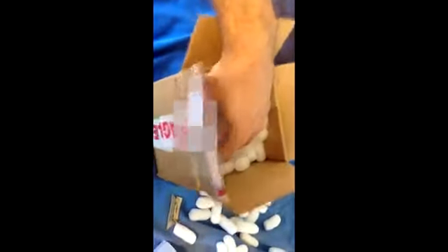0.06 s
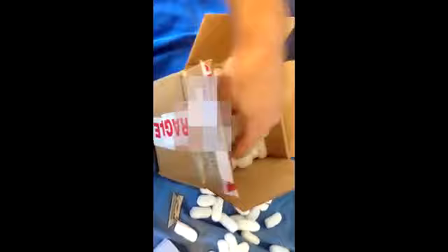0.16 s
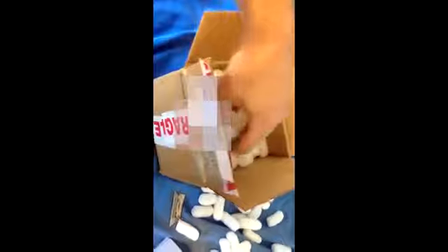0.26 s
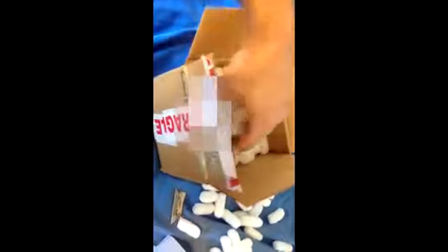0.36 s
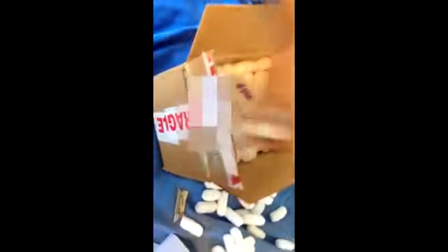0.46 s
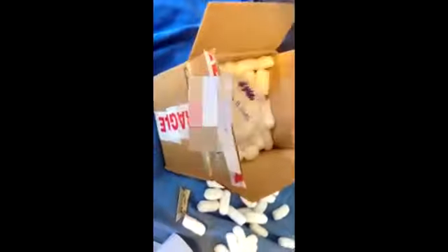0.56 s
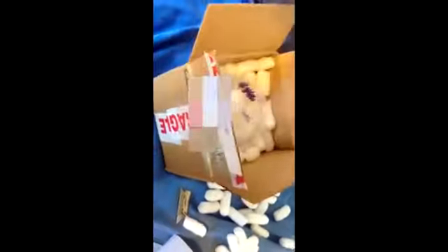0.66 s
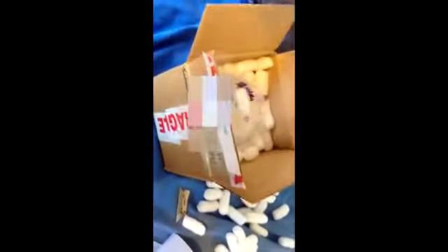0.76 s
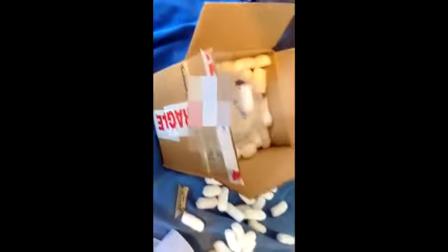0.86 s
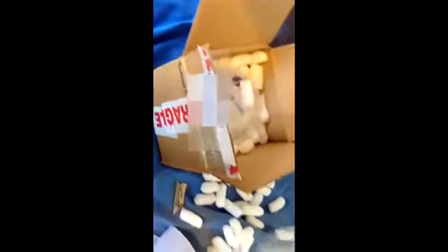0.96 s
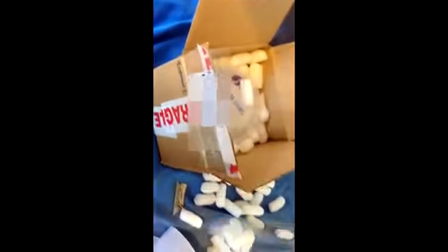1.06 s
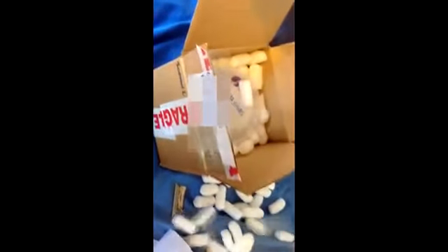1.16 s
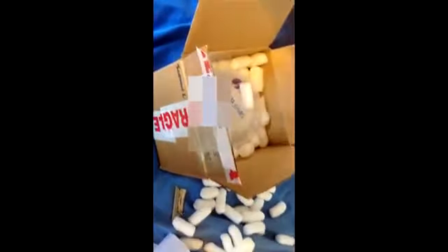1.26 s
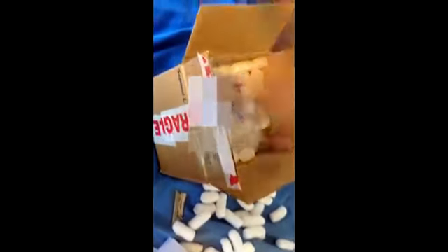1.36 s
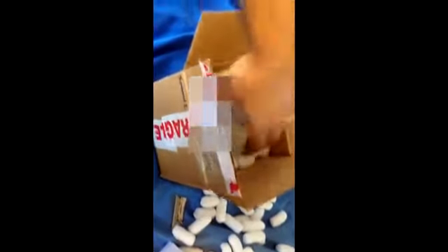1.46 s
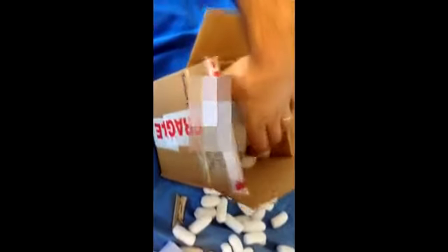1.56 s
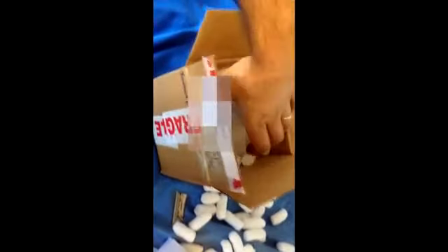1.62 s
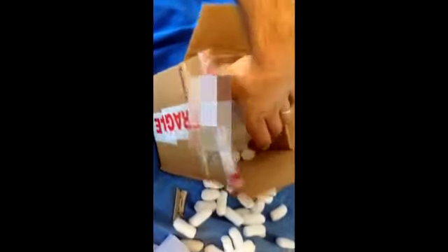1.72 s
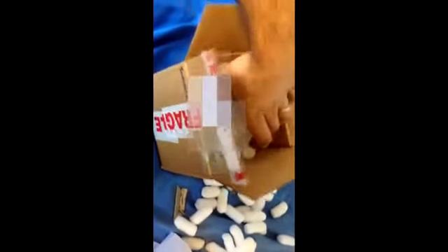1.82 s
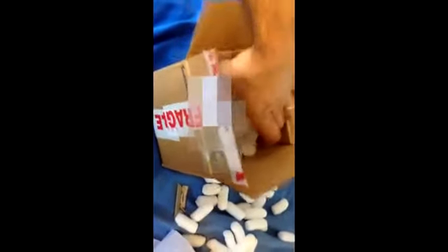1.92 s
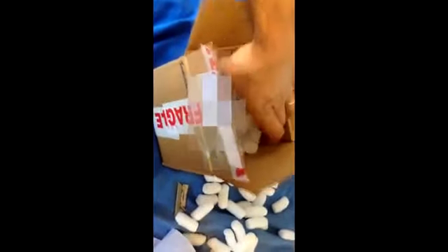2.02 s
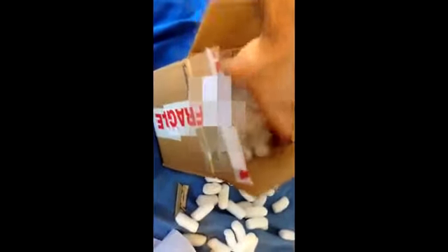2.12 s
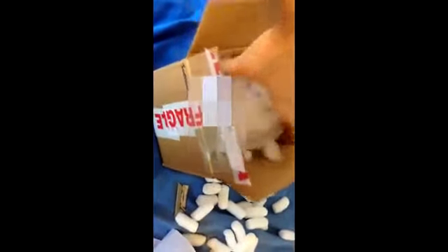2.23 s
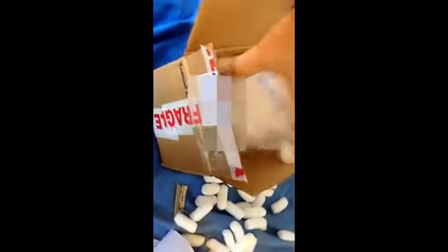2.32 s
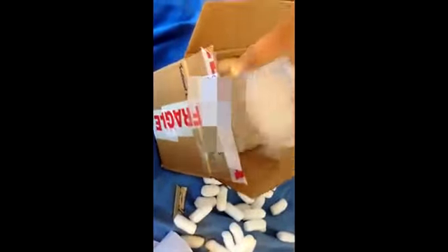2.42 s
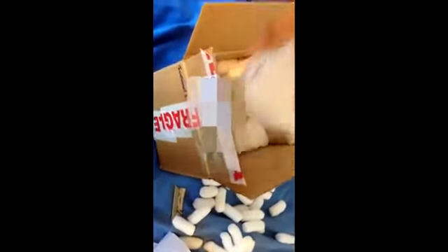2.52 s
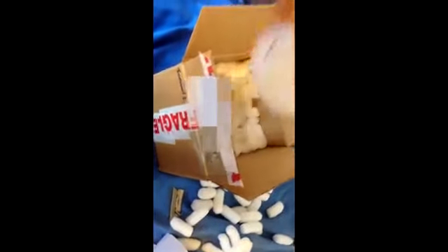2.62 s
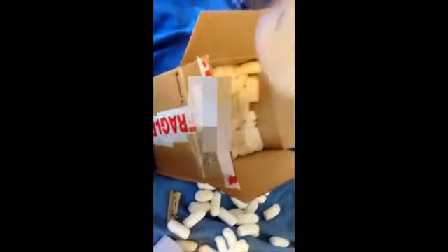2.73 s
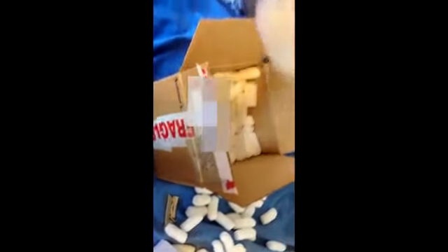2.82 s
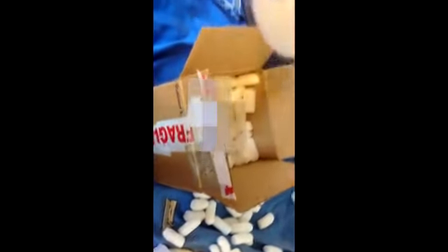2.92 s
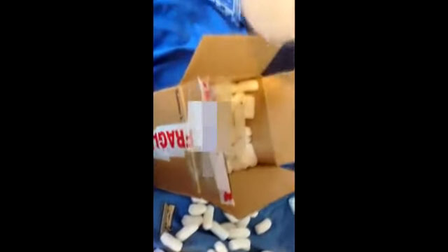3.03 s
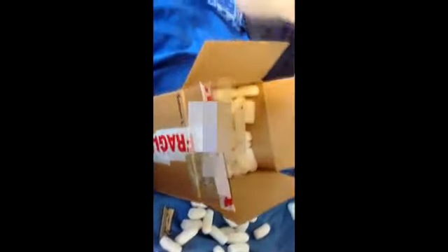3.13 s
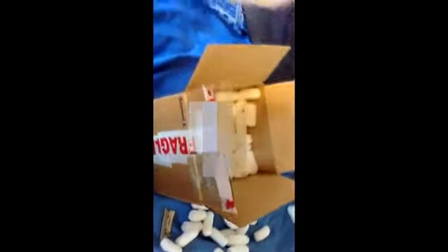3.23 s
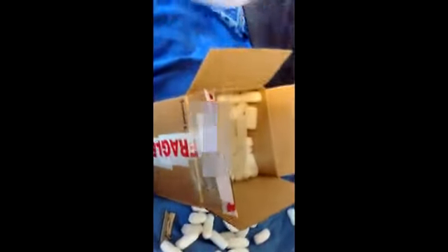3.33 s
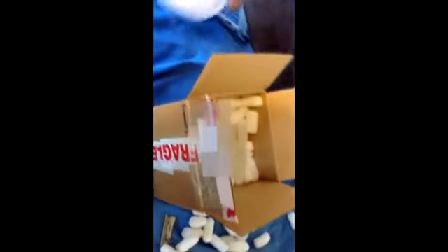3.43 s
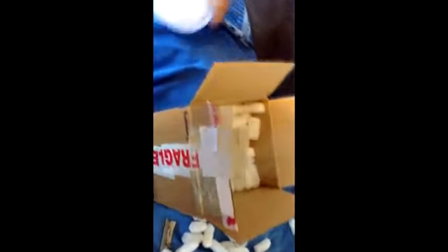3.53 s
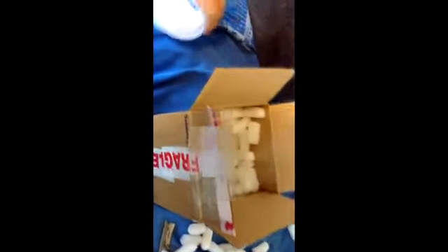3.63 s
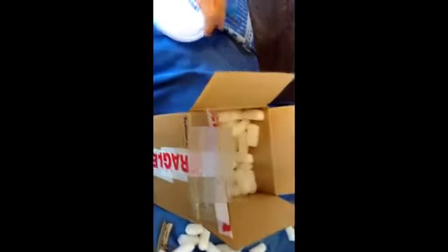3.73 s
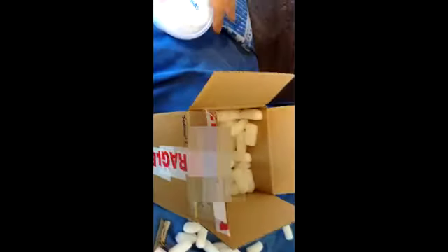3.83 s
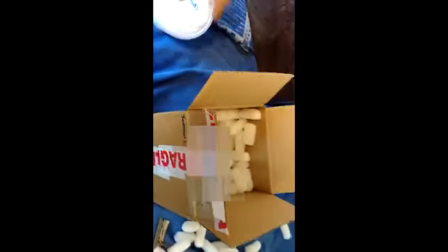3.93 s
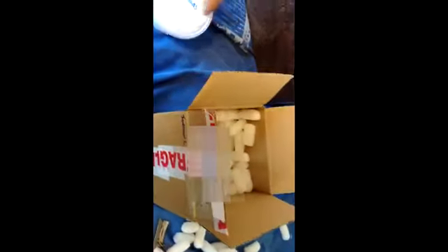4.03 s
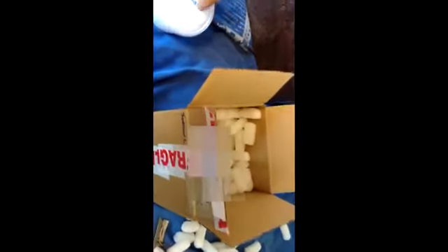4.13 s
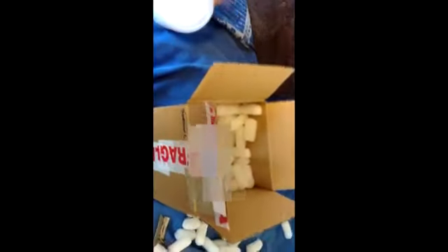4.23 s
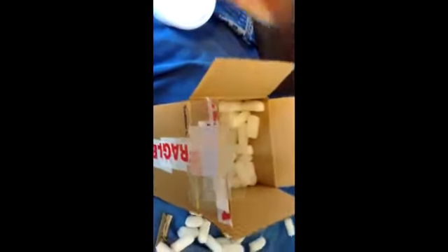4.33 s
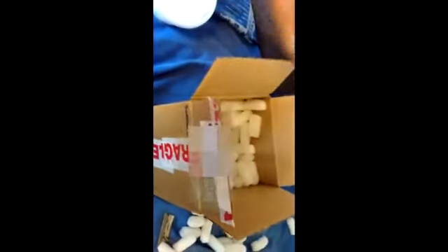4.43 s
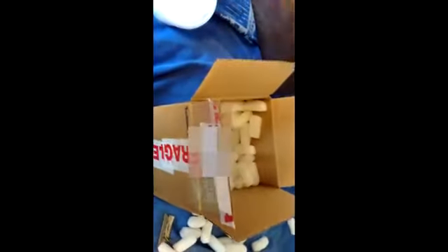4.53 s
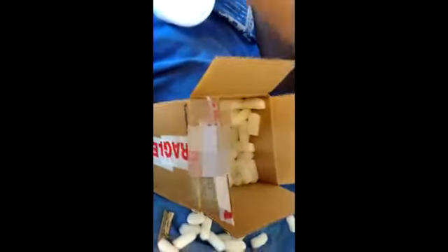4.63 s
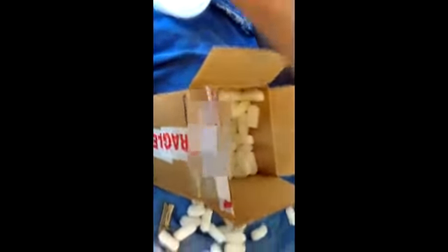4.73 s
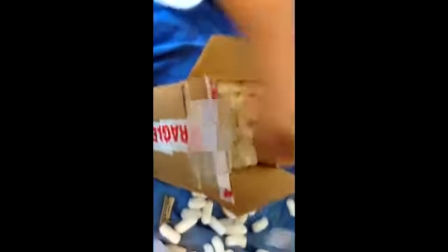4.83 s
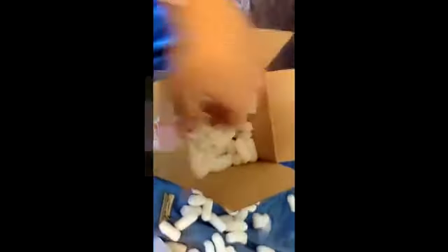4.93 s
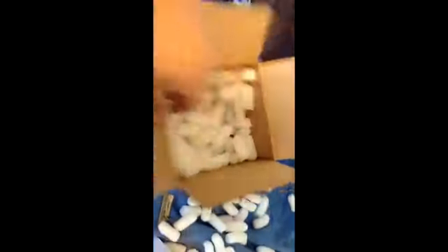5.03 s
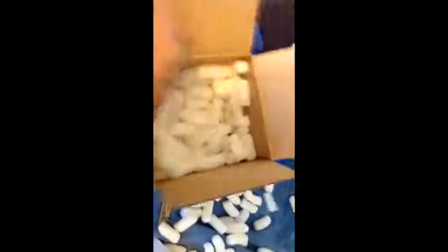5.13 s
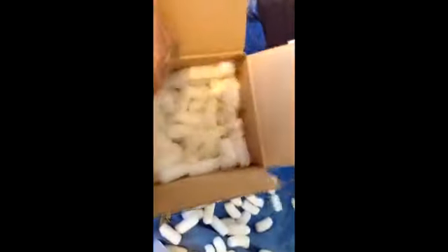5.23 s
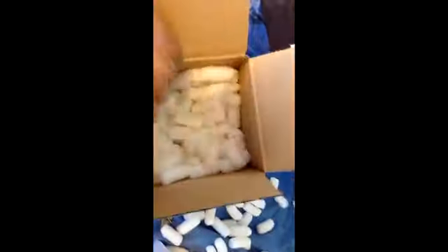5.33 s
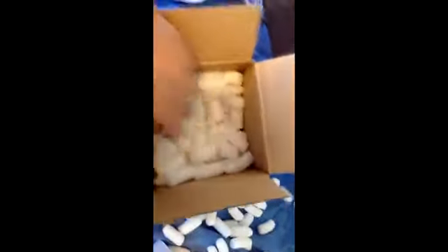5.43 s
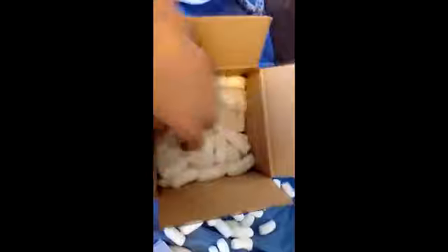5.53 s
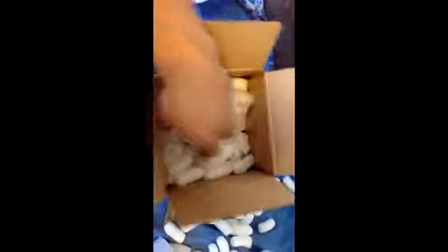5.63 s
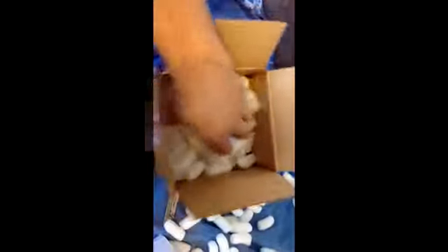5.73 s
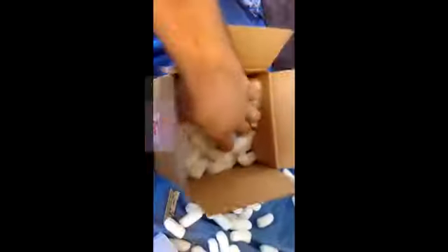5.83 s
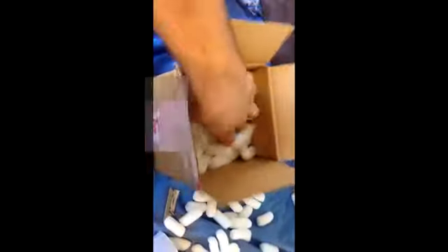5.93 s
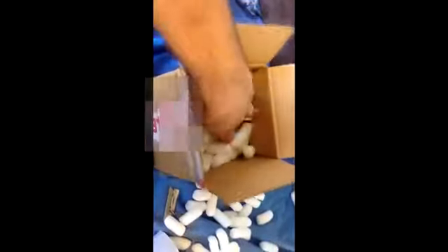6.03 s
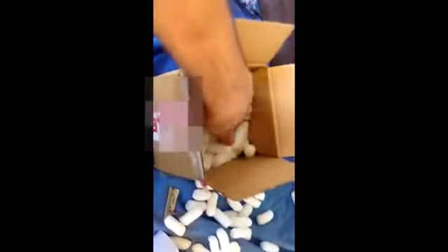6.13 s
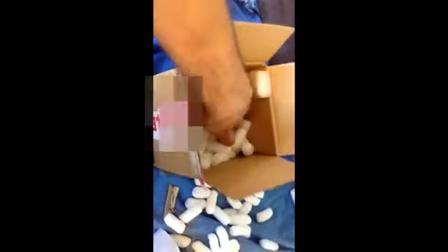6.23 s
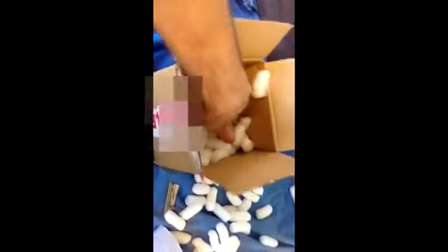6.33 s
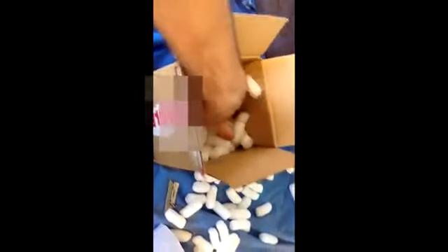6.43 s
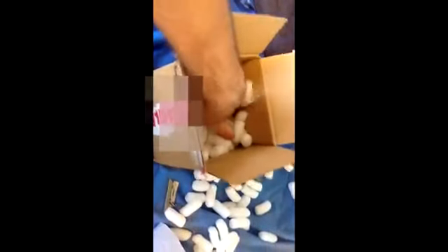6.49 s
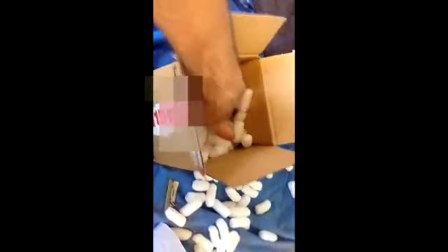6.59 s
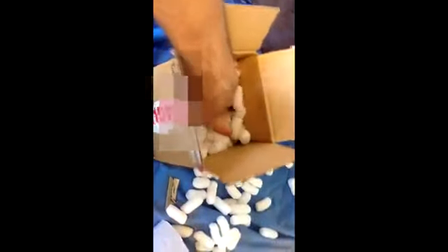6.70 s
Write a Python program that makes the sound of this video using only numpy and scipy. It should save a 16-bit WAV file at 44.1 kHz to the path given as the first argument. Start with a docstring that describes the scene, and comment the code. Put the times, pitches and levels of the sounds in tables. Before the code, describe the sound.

A hand rummages through foam packing peanuts in a cardboard box, heard through a phone microphone with faint hiss in a room with little echo. From the start come dry crackling and crunching in short pushes, with sharp ticks, small scrapes and a soft bump near 0.6 seconds. The rustle eases around 1 second, then swells from 1.5 to 2.4 seconds, with the cardboard drumming lightly underneath. Several light finger knocks and ticks follow until about 3 seconds. Then it is quiet, with only faint rustling and a few small clicks between 4 and 4.6 seconds. Just before 5 seconds a knuckle raps the flap, followed by a couple of sharp ticks. From 5.5 seconds the digging returns at its loudest, dense and crunchy, with hollow knocks on the box around 5.8 and 6.2 seconds, continuing to the end at nearly 7 seconds.

```python
"""In a soft room, a hand digs through foam packing peanuts in a cardboard box, lifts a wrapped parcel
out and digs again. Stick-slip friction between the peanuts makes countless impulses, which excite
resonances of the foam (crackle and crunch) and of the cardboard (drumming). Single peanuts tick and
scrape, a finger knocks the box, a knuckle raps its flap, and padded bumps sound underneath.
A mono phone microphone takes it in and adds its own hiss."""
import sys
import numpy as np
from scipy import signal
from scipy.fft import rfft, irfft, next_fast_len
from scipy.io import wavfile
from scipy.ndimage import uniform_filter1d, map_coordinates

SR = 44100
rng = np.random.default_rng(int(sys.argv[2]) if len(sys.argv) > 2 else 0)


def to_wav(sig):
    """Store sig (one row per channel, or 1-D mono) as 16-bit WAV at the path in sys.argv[1].

    Samples outside -1..1 are clipped; the rate is SR.
    """
    pcm = np.clip(np.atleast_2d(sig), -1, 1) * 32767
    pcm = np.round(pcm).astype(np.int16)
    wavfile.write(sys.argv[1], SR, pcm.T)  # frames by channels


N = 298116

# the digging hand: (time [s], steady crackle [dB], crunch re crackle [dB], drumming re crackle [dB])
DIG_LEVELS = [(0, -51.5, 0.5, -8), (.235, -55.5, -3, -11.5), (.35, -56.5, -1.5, -15), (.62, -63.5, -6, -7),
              (.85, -61.5, -9, -14.5), (1.035, -74, -13, -12), (1.09, -62.5, -6, -11.5),
              (1.46, -78.5, -5, -9), (1.49, -60, -7, -10.5), (1.7, -51, -1.5, -7), (1.9, -48.5, -0.5, -3.5),
              (2.08, -50.5, -0.5, -5), (2.2, -49.5, -10, -16.5), (2.36, -51, -17, -15),
              (2.43, -72, 2.5, 2.5), (2.51, -62.5, -3.5, -3.5), (2.9, -70, -1.5, 3), (3.3, -75.5, -5, -8),
              (4.0, -77, 0.5, 4.5), (4.2, -64, -9, -12.5), (4.4, -74, 1.5, 0.5), (4.58, -72, -12, -17),
              (4.92, -80, -1, 0), (4.97, -67.5, 3.5, 8), (5.09, -72.5, 2, 1.5), (5.27, -61, -1.5, -3.5),
              (5.53, -55, -4, -1), (5.62, -46.5, -3.5, -7), (6.0, -45.5, -1.5, -4.5), (6.45, -46, 1, -3),
              (6.76, -44, 0, -2)]
# separate pushes of the fingers through the foam: (start [s], rise [s], length [s], level [dB])
FINGER_PUSHES = [(0.099, .006, 0.11, -49.5), (0.121, 0.0085, 0.035, -49), (0.246, .004, 0.025, -52),
                 (0.301, .008, 0.041, -54), (0.372, 0.018, 0.057, -55.5), (0.651, 0.022, 0.11, -56.5),
                 (0.759, 0.026, 0.056, -52), (1.037, 0.036, 0.074, -57.5), (1.222, .008, 0.056, -64),
                 (1.478, 0.0075, 0.088, -51), (1.526, 0.0088, 0.091, -47), (1.757, 0.009, .085, -47),
                 (2.055, 0.056, 0.065, -44.5), (2.115, 0.011, 0.13, -45), (2.264, .02, 0.03, -45.5),
                 (2.316, .015, 0.039, -48), (2.741, 0.016, 0.031, -63), (4.118, 0.011, 0.014, -61.5),
                 (4.153, .006, 0.019, -61.5), (4.175, 0.021, 0.077, -61.5), (4.283, 0.039, 0.071, -63.5),
                 (4.549, .015, 0.045, -60.5), (5.03, 0.0087, 0.024, -65.5), (5.295, 0.022, 0.14, -55),
                 (5.398, .05, 0.079, -51), (5.553, .035, 0.054, -44), (5.654, 0.037, 0.035, -41),
                 (5.762, .004, 0.023, -42.5), (5.79, 0.037, 0.056, -42.5), (5.896, 0.067, 0.087, -41.5),
                 (6.199, 0.037, 0.061, -38), (6.26, 0.027, 0.073, -43), (6.472, 0.038, 0.13, -46),
                 (6.593, 0.042, 0.11, -41.5), (6.735, 0.023, .04, -44.5)]
# resonances of the small foam cells: (frequency [Hz], bandwidth [Hz], relative gain [dB])
CELL_MODES = [(4460, 970, -1), (6590, 1620, -0.5), (8150, 1720, -1.5), (12940, 3600, -11.5)]
# resonances of whole peanuts: (frequency [Hz], bandwidth [Hz], relative gain [dB])
PEANUT_MODES = [(925, 570, -9), (1438, 307, 0.5), (2090, 580, 0), (3560, 640, -2)]
# resonances of the cardboard walls: (frequency [Hz], bandwidth [Hz], relative gain [dB])
WALL_MODES = [(330, 89, 0.5), (448, 124, 3), (570, 181, 2.5), (770, 420, -5.5)]
# resonances of the box as a whole: (frequency [Hz], bandwidth [Hz], relative gain [dB])
BOX_MODES = [(138, 66, -12.5), (203.6, 53, 0.5)]
# boom of the whole box: (time [s], level re wall drumming [dB])
BOOM_LEVELS = [(.9, -6), (1.7, -14), (2.4, -1.5), (3.7, 1), (5, -6.5), (6.76, -9)]
# single peanuts ticking: (time [s], level [dB], pitch [Hz])
PEANUT_TICKS = [(0.2304, -43, 4340), (0.292, -29, 6230), (0.571, -34, 5460), (0.7412, -29, 7340),
                (0.86, -37, 7510), (0.944, -38, 7860), (1.048, -31.5, 7900), (1.058, -27.5, 5940),
                (1.075, -42, 8030), (1.089, -39, 5880), (1.098, -34, 6670), (1.1083, -30, 5680),
                (1.17, -31, 3200), (1.233, -35, 5700), (1.541, -23, 4670), (1.815, -28, 3470),
                (1.837, -32, 3460), (2.1122, -20.5, 4120), (2.1985, -24, 8300), (2.237, -26, 6920),
                (2.444, -32, 5910), (2.494, -38, 8530), (2.5022, -38, 3340), (2.536, -39, 4100),
                (2.561, -38, 4050), (2.6439, -40, 6260), (2.7556, -47, 4800), (2.8522, -35, 3330),
                (4.0498, -41.5, 5960), (4.1605, -33.5, 5870), (4.56, -39, 7450), (4.574, -42, 4360),
                (5.1642, -35, 6700), (5.2097, -25, 6000), (5.774, -21, 7560), (6.3025, -25, 6500)]
# one peanut dragged along another: (start [s], end [s], pitch [Hz], level [dB])
PEANUT_SCRAPES = [(0.104, 0.187, 3470, -54.5), (0.245, 0.276, 1680, -54), (1.49, 1.527, 3500, -54.5),
                  (1.53, 1.638, 4630, -51.5), (1.76, 1.867, 3530, -47), (2.057, 2.125, 1720, -58),
                  (2.109, 2.214, 4760, -45.5), (2.272, 2.352, 4500, -59), (4.206, 4.244, 3340, -61),
                  (4.266, 4.51, 1360, -71), (5.568, 5.632, 2150, -48.5), (6.21, 6.342, 2070, -49),
                  (6.605, 6.72, 2100, -52)]
# blows of a finger on the cardboard: (time [s], impulse strength [dB])
FINGER_KNOCKS = [(1.086, -10), (1.189, -11), (1.225, -10), (2.495, -6.5), (2.509, -2), (2.561, -4),
                 (2.575, -8), (2.645, -7), (2.755, -4.5), (2.85, 1.5), (2.917, -7), (5.031, -4),
                 (5.179, -8), (5.259, -7), (5.775, 11), (5.985, 4), (6.243, 6.5)]
# resonances of the loose flap: (frequency [Hz], relative level [dB], T60 [s])
FLAP_MODES = [(136, -5, 0.13), (232, 2.5, 0.056), (306, 0.5, 0.043), (463, -1.5, 0.054), (555, -2.5, 0.067),
              (616, -9, 0.083), (1210, -7, 0.026), (1540, -1.5, 0.014)]
# soft bumps: (centre time [s], envelope peak [dB], pitch [Hz], half-width at 1/e [s])
SOFT_BUMPS = [(.137, -55, 183, 0.019), (0.331, -55, 172, 0.015), (0.563, -54, 128, 0.01),
              (.648, -38.5, 174, 0.0053), (.688, -45.5, 458, 0.0036), (0.755, -50, 114, 0.0063),
              (2.25, -56.5, 144, 0.016), (5.835, -37.5, 520, 0.012)]
# reverberation time of the room: (frequency [Hz], T60 [s])
ROOM_T60 = [(200, 0.37), (2000, 0.086), (10000, 0.13)]
# room tone and microphone hiss: (frequency [Hz], relative spectral density [dB])
HISS_SPECTRUM = [(18, -46), (30, -13.5), (64, -31), (102, -8.5), (350, 1), (546, -7.5), (921, -12),
                 (1230, -10.5), (1360, -15), (2420, -16), (10500, -24.5), (14300, -18.5), (15500, -21)]

SQUEAK_DB = -7.5  # re the midpoint of the crackle and crunch levels
STRAY_DB = -12.5  # stray peanuts clicking, re the crackle
SAG_DB_PER_S, RELEASE_S = 12.5, 0.0058  # a push tires while it lasts, then dies away
TICK_T60_S, TICK_SHORTENING = 0.014, 0.33  # decay of a -42 dB tick; harder ones are shorter (dB per dB)
SCRAPE_Q, KNOCK_CONTACT_S = 10, 0.00044
RAP_TIME_S, RAP_GAIN_DB = 4.9342, -32
REVERB_DB, HISS_DB, BAND_LIMIT_HZ = -13.5, -68.5, 15020


def digging():
    """Friction drives resonators: slipping foam crackles, crunches and sets the cardboard drumming."""
    t = np.arange(N) / SR
    times, *levels = np.transpose(DIG_LEVELS)
    steady_db, crunch_db, drum_db = [np.interp(t, times, level) for level in levels]
    effort = np.hypot(amp(steady_db), finger_pushes())
    cell_slips = stick_slip(5000, spread_db=2.0, clump_db=1.0, rub_db=1)
    crackle = drift(resonate(cell_slips, CELL_MODES), depth_db=1.5)
    peanut_slips = stick_slip(2500, spread_db=3, clump_db=0.0, rub_db=3.5)
    crunch = amp(crunch_db) * drift(resonate(peanut_slips, PEANUT_MODES), depth_db=2.0)
    squeak = amp(crunch_db / 2 + SQUEAK_DB) * foam_squeaks(per_second=400)
    taps = stick_slip(400, spread_db=1.5, clump_db=-1.5, rub_db=-0.5)
    boom = amp(np.interp(t, *np.transpose(BOOM_LEVELS))) * unit(resonate(taps, BOX_MODES))
    drumming = amp(drum_db) * (unit(resonate(taps, WALL_MODES)) + boom)
    stray_slips = stick_slip(180, spread_db=0.2, clump_db=1.3, rub_db=-32)
    clicks = amp(STRAY_DB) * unit(resonate(stray_slips, CELL_MODES + PEANUT_MODES[1:]))
    return effort * (crackle + crunch + squeak + clicks + drumming)


def finger_pushes():
    """Incoherent addition: overlapping pushes sum in power to give one amplitude envelope."""
    power, t = np.zeros(N + SR), np.arange(SR // 2) / SR
    for start, rise, length, db in FINGER_PUSHES:
        held = np.minimum(t, length)
        gain = np.clip(held / rise, 0, 1) * amp(db - SAG_DB_PER_S * held)
        power[round(start * SR):][:len(t)] += gain ** 2 * np.exp(-(t - held) / RELEASE_S)
    return np.sqrt(power[:N])


def stick_slip(per_second, spread_db, clump_db, rub_db):
    """Stick-slip friction: random impulses, mostly small, over a steady rub; both swell in clumps."""
    slipping = rng.random(N) < per_second / SR
    size = amp(spread_db * np.minimum(rng.exponential(size=N), 4)) * rng.standard_normal(N)
    clumps = amp(clump_db * (wobble(110) + 0.74 * wobble(25)))
    rub = amp(rub_db) * rng.standard_normal(N)
    return clumps * (unit(slipping * size) + rub)


def resonate(force, modes):
    """Modal superposition: a body responds as a sum of damped resonators, here of alternating sign."""
    return filtered(force, lambda hz: sum(
        (-1) ** k * amp(db) * 1j * hz * width / (centre ** 2 - hz ** 2 + 1j * hz * width)
        for k, (centre, width, db) in enumerate(modes)))


def drift(x, depth_db):
    """Spectral modulation: the ringing pieces keep changing, so narrow bands swell and fade."""
    spectra = signal.stft(x, nperseg=256)[2]
    swell = uniform_filter1d(rng.standard_normal(spectra.shape), size=3, axis=0)  # smooth in frequency
    swell = uniform_filter1d(swell, size=14, axis=1)  # and in time
    return unit(signal.istft(spectra * amp(depth_db * unit(swell)), nperseg=256)[1][:N])


def foam_squeaks(per_second):
    """Damped oscillation: each tiny squeak of foam skin is a brief sine of its own pitch and size."""
    onset, pitch, size = rng.random((3, int(per_second * N / SR)))
    hz, t = 2000 * 4.5 ** pitch[:, None], np.arange(300) / SR
    gain = amp(-3 * np.log(size[:, None] + 0.023))
    grains = gain * np.sin(2 * np.pi * hz * t) * t * np.exp(-t / 0.00045)
    samples = (onset[:, None] * N).astype(int) + np.arange(len(t))
    return unit(np.bincount(samples.ravel(), grains.ravel())[:N])


def peanut_ticks():
    """Fracture noise: foam cracks for a few milliseconds, strongest at the peanut's own resonance."""
    out, t = np.zeros(N + SR), np.arange(SR // 10) / SR
    for start, db, hz in PEANUT_TICKS:
        age = t / (TICK_T60_S * amp(-TICK_SHORTENING * (db + 42)))  # in units of T60
        burst = rng.standard_normal(len(t)) * (1 - np.exp(-40 * age)) * amp(-60 * age)
        burst[SR // 5000] += 3.5  # the first break is the sharpest
        tick = burst + 2.3 * signal.lfilter(*signal.iirpeak(hz, Q=2.5, fs=SR), burst)
        out[round(start * SR):][:len(t)] += amp(db) * tick / np.abs(tick).max()
    return filtered(out[:N], lambda hz: 1j * hz / (1200 + 1j * hz) / (1 + 1j * hz / 14000))  # band-pass


def peanut_scrapes():
    """Forced resonance: slips ring one narrow band for as long as a peanut drags along another."""
    out, t = np.zeros(N), np.arange(N) / SR
    for start, end, hz, db in PEANUT_SCRAPES:
        drag = np.clip((t - start) / 0.0072, 0, 1) * np.clip((end - t) / 0.0053, 0, 1)
        slips = stick_slip(1500, spread_db=3.5, clump_db=4.0, rub_db=-3.0)
        out += amp(db) * drag * unit(resonate(slips, [(hz, hz / SCRAPE_Q, 0)]))
    return out


def finger_knocks():
    """Impact excitation: a blunt force pulse rings the modes of the box and its walls."""
    force, t = np.zeros(N + SR), np.arange(SR // 20) / SR
    pulse = t * np.exp(-t / KNOCK_CONTACT_S)
    for start, db in FINGER_KNOCKS:
        force[round(start * SR):][:len(t)] += amp(db) * pulse / pulse.sum()
    return resonate(force[:N], BOX_MODES + WALL_MODES)


def flap_rap():
    """Free vibration: struck by a knuckle, the flap rings under a dull crack; grit hisses after it."""
    out, t = np.zeros(N), np.arange(SR // 2) / SR
    ring = sum(amp(db - 60 * t / t60) * np.sin(2 * np.pi * hz * t) for hz, db, t60 in FLAP_MODES)
    ring *= -(1 - np.exp(-t / 0.00044))  # negative because the flap is pushed away
    burst = amp(1.5 - 60 * t / 0.024) * rng.standard_normal(len(t))
    crack = signal.lfilter(*signal.butter(1, 3000, fs=SR), burst)
    grit = amp(-20.5 - 60 * t / 0.43) * np.diff(rng.standard_normal(len(t) + 1))
    out[round(RAP_TIME_S * SR):][:len(t)] = amp(RAP_GAIN_DB) * (ring + crack + grit)
    return filtered(out, lambda hz: (1j * hz / (110 + 1j * hz)) ** 4)  # the rap carries no deep bass


def soft_bumps():
    """Wave packets: each padded thud is a few cycles of a sine under a Gaussian envelope."""
    t = np.arange(N) / SR
    return sum(amp(db) * np.exp(-((t - centre) / width) ** 2) * np.sin(2 * np.pi * hz * (t - centre))
               for centre, db, hz, width in SOFT_BUMPS)


def reverberation(x):
    """Diffuse decay: the room's impulse response is noise in which each frequency dies at its own rate."""
    hz, t, spectra = signal.stft(rng.standard_normal(SR // 2), SR, nperseg=256)
    decay = amp(-60 * t / log_interp(ROOM_T60, hz)[:, None])
    tail = signal.istft(spectra * decay, SR, nperseg=256)[1]
    delayed = np.pad(x, (300, 0))
    return signal.fftconvolve(delayed, tail / np.linalg.norm(tail))[:N]


def hiss():
    """Noise floor: room tone and microphone hiss form a coloured noise that wavers a little."""
    level_db = HISS_DB + 0.18 * wobble(3.8)
    noise = filtered(rng.standard_normal(N), lambda hz: amp(log_interp(HISS_SPECTRUM, hz)))
    return amp(level_db) * unit(noise)


def amp(db):
    """Decibel law: 20 dB is a factor of ten in amplitude."""
    return 10 ** (np.asarray(db) / 20)


def unit(x):
    """Normalisation to an rms of 1."""
    return x / np.sqrt(np.mean(x ** 2) + 1e-20)


def log_interp(points, hz):
    """Interpolation of (frequency [Hz], value) points on a logarithmic frequency axis."""
    frequencies, values = np.transpose(points)
    return np.interp(np.log(hz + 1), np.log(frequencies + 1), values)


def wobble(rate):
    """Spline interpolation: a smooth curve through random knots, rate of them a second."""
    return map_coordinates(rng.standard_normal(int(N * rate / SR) + 4), [np.arange(N) * rate / SR])


def filtered(x, response):
    """Linear filtering: the spectrum of x is multiplied by a complex frequency response."""
    size = next_fast_len(N + SR // 2)
    return irfft(rfft(x, size) * response(np.fft.rfftfreq(size, 1 / SR)), size)[:N]


def scene():
    """Superposition: direct sound, reverberation and noise add at one microphone feeding both channels."""
    direct = digging() + peanut_ticks() + peanut_scrapes() + finger_knocks() + flap_rap()
    mono = direct + amp(REVERB_DB) * reverberation(direct) + soft_bumps() + hiss()
    return np.tile(mono, (2, 1))


def record(dry):
    """Band limiting: the phone keeps nothing above its cutoff frequency."""
    return np.array([filtered(side, lambda hz: hz < BAND_LIMIT_HZ) for side in dry])


dry = scene()
out = record(dry)
to_wav(out)
```